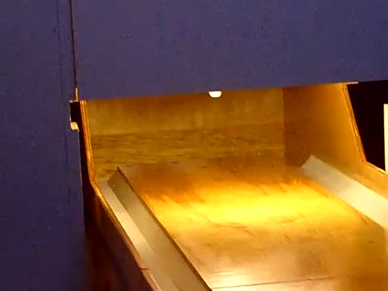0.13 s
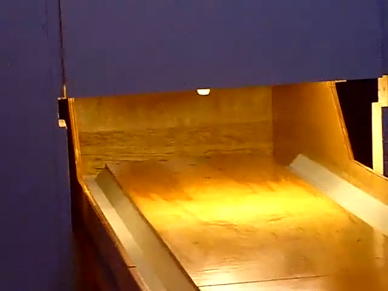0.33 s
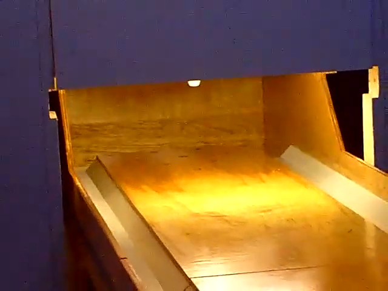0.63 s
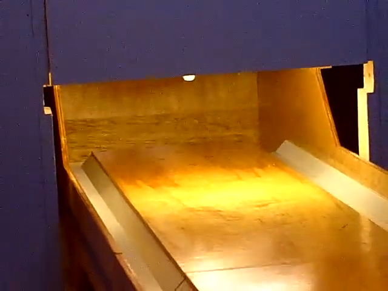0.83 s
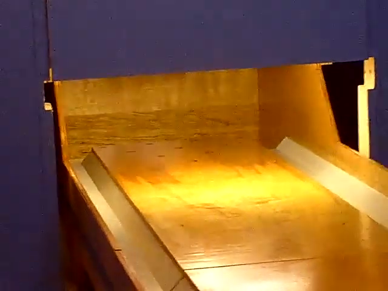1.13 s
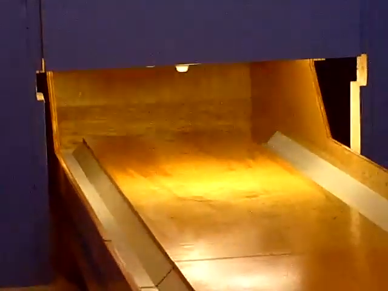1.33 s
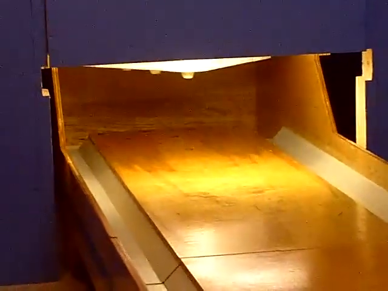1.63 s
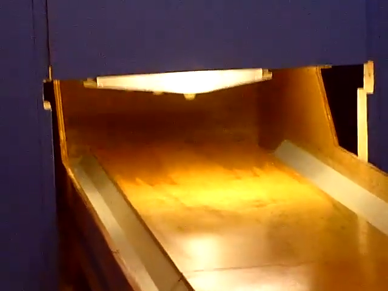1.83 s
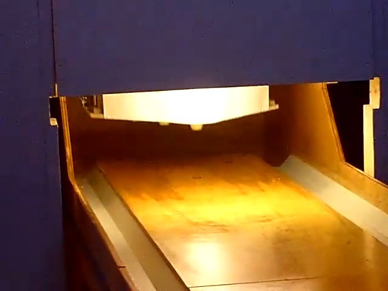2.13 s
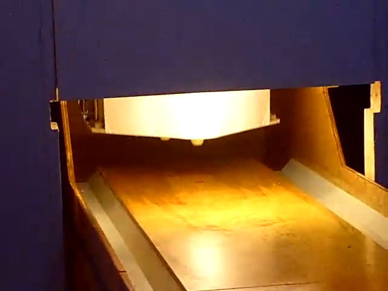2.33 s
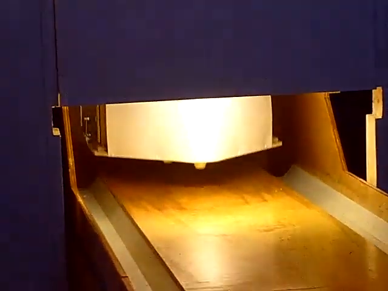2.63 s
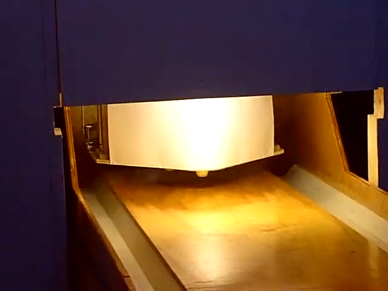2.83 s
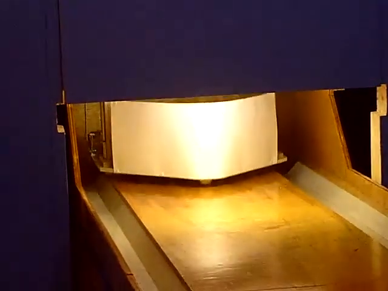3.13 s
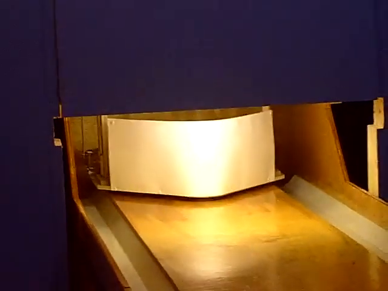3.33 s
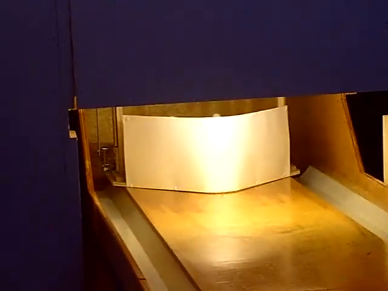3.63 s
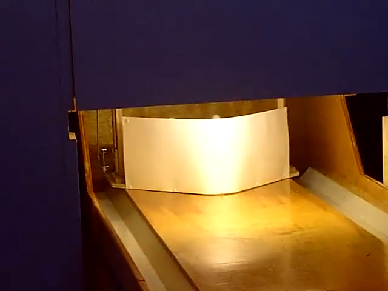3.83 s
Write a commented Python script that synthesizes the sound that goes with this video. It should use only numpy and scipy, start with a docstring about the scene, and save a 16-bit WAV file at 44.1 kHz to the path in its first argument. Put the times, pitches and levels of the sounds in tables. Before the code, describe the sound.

A wooden machine table clunks and scrapes downward, thuds hard on a deck, then jingles lightly

```python
"""Homemade pinsetter, small room

One microphone in a small room: a homemade pinsetter lowers its pin table onto a wooden deck.
The frame knocks as it takes the load; the table slides down its guides and scrapes past a tight spot.
It lands with a heavy rattling thud, and a light metal part jingles as the linkage moves on.
Blows are pushes, dying sines and noise tails; sliding is coloured noise with tiny slips.
Filtered noise makes the room tone."""
import sys
import numpy as np
from scipy import signal
from scipy.fft import rfft, irfft
from scipy.io import wavfile

SR = 44100
rng = np.random.default_rng(int(sys.argv[2]) if len(sys.argv) > 2 else 0)


def to_wav(s):
    """Save 16-bit WAV."""
    ch = np.atleast_2d(s).T  # columns
    pcm = np.round(np.clip(ch, -1, 1) * 32767)  # PCM
    wavfile.write(sys.argv[1], SR, pcm.astype(np.int16))


N = 176400  # samples, 4 s

# Room and microphone noise: f/Hz, level/dB
FLOOR_SPECTRUM = [(60, -6.5), (85, -12.5), (130, -9.5), (300, -15), (480, -16), (800, -23.5), (3000, -32),
                  (9700, -32.5), (12000, -45.5)]
FLOOR_DB = -64
START_S, EDGE_HZ = 0.074, 11500  # recorder start, upper band edge

# Dry ticks close by: t/s, level/dB, dull above f/Hz, ring of the wood behind f/Hz, its level/dB
TICKS = [(1.3992, -43.5, 4200, 1070, 5), (1.4247, -49.5, 11100, 680, 2)]
# Ring of a tick: f/Hz, level/dB
TICK_MODES = [(1450, 0.5), (2300, 1.5), (3000, -3), (4400, -1.5), (7400, -1.5)]
TICK_T60_S, TICK_WOOD_T60_S = 0.0083, 0.016

# Jingle of light metal: f/Hz, level/dB
JINGLE_SPECTRUM = [(1000, -3.5), (2100, -9.5), (3200, -21), (6500, -17.5), (7700, -12), (8600, -5.5),
                   (9400, -15), (12000, -25)]
JINGLE_S, JINGLE_DB, JINGLE_T60_S = 3.842, -14, 0.53
# Range of the ringing of thin metal, and its strength against the noise
METAL_LOW_HZ, METAL_HIGH_HZ, METAL_SHARE = 1787, 9970, 0.62

# Rasp of the linkage: f/Hz, level/dB
RASP_SPECTRUM = [(170, -7.5), (265, 7.5), (370, -7), (600, 1.5), (1200, -4), (1450, -16), (2300, -15.5),
                 (4000, -34)]
RASP_DB = -49
RASP_S, RASP_RISE_S, RASP_FALL_S = 1.04, 0.042, 0.067  # peak time, then times to change by a factor e

# The frame shudders as the table binds, then lets go: f/Hz, level/dB, t60/s
SHUDDER_MODES = [(100, -41, 0.24), (127, -33.5, 0.16), (286.6, -37, 0.15), (693, -49.5, .22)]
SHUDDER_S, SHUDDER_SWELL_S = 2.8, 0.027  # peak time, time to grow by a factor e

# Sliding on the guides: t/s, rumble level/dB, mid rub level/dB, treble hiss level/dB
SLIDE_LEVELS = [(0, -72, -94, -90), (.85, -70.5, -87, -87), (1, -61, -75.5, -85), (1.3, -68.5, -85, -85),
                (1.44, -56.5, -66, -72), (1.56, -56, -67, -77), (1.7, -66, -75.5, -86),
                (1.88, -58.5, -75, -80), (2.03, -57.5, -68.5, -72.5), (2.58, -57.5, -73.5, -73.5),
                (2.77, -50, -62, -63), (2.97, -58, -70, -78), (3.06, -61.5, -65.5, -74),
                (3.23, -60, -71.5, -80.5), (3.8, -53, -64.5, -75), (4, -54.5, -57, -61)]
# Spectra of the rumble, the rub and the hiss, each: f/Hz, level/dB
RUMBLE_SPECTRUM = [(50, -27.5), (100, -7), (148, 5), (200, -3), (380, -6.5), (800, -13.5), (1500, -21),
                   (3000, -54.5), (8000, -41)]
RUB_SPECTRUM = [(600, -20), (1500, -2.5), (2300, 3), (3100, -2), (9000, -17.5)]
HISS_SPECTRUM = [(3000, -19), (6200, -3), (8300, 2), (10000, -4), (12000, -42)]
# Resonances of the guides under the sliding table: f/Hz, width/Hz, level against the rumble/dB
GUIDE_TONES = [(270, 11.5, -10), (793, 36, -18.5), (2138, 45, -23.5), (2770, 47, -26.5)]
# Short scrapes on the guides: t/s, level/dB, rise/s, t60/s of the ringing, dull above f/Hz
SCRAPES = [(1.732, -25.5, 0.0019, 0.37, 10300), (2.775, -15.5, 0.018, 0.45, 10900),
           (3.53, -24.5, .02, 0.91, 10100), (3.65, -23, 0.02, 0.4, 7050), (3.967, -14.5, 0.008, 0.31, 2550)]
# Colour of the scrapes: f/Hz, level/dB
SCRAPE_SPECTRUM = [(500, 2.5), (1300, 1), (2000, -5), (2900, -3), (4200, -5.5), (6000, -3.5), (8500, -3.5),
                   (10500, -8), (12000, -21)]
GRAINS_PER_S, GRAIN_SPREAD_DB, GRAIN_SHARE = 400, 3, 0.41  # share is against the smooth rub
WAVER_DB, WAVER_HZ = 1.5, 22  # uneven pressure on the guides

# Knocks in the frame: t/s, level/dB, rise/s, muffled above f/Hz, boom level/dB
KNOCKS = [(0.691, -15, 0.012, 1460, -8.5), (.85, -25, 0.016, 500, -10), (.967, -15, 0.0051, 1500, -12),
          (1.725, -2, 0.0027, 2970, -30), (1.744, -0.5, 0.0041, 1160, -10.5), (2.741, -18, .006, 500, -2.5),
          (2.7855, -6, 0.01, 1500, -3), (2.825, -10.5, 0.0045, 1400, -3.5), (3.622, 3, 0.02, 506, 5.5),
          (3.839, -16, 0.0064, 3000, -16), (3.92, -3.5, 0.022, 2600, -7), (3.969, -12, 0.0067, 5940, -27)]
# Colour of a knock: f/Hz, level/dB
KNOCK_SPECTRUM = [(50, -32.5), (130, 3.5), (300, -4.5), (380, -8), (580, -2), (900, -8.5), (1250, -5.5),
                  (1550, -16.5), (8000, -25)]
# Decay of a knock: f/Hz, t60/s
KNOCK_T60 = [(120, 1), (500, 0.52), (2000, 0.79), (8000, 0.67)]
# Ring of the cabinet's panels under the knocks: f/Hz, level/dB, t60/s
PANEL_MODES = [(181.7, 0.5, 0.57), (272.3, 1, 0.4), (420.5, -3, 0.48), (475, -3.5, 0.5), (569, -0.5, 0.47),
               (691, -7, 0.57), (760, -8, 0.44), (1060, -5, .4), (1160, -15, 0.32), (1307, -5.5, 0.47),
               (1680, -9.5, 0.35), (2990, -13, 0.39)]
# Boom of the frame: f/Hz, level/dB, t60/s
FRAME_MODES = [(126.6, 5, 0.44), (143, -0.5, 0.29), (168.6, -3, 0.45), (269.1, -6.5, 0.54),
               (287.4, -1, 0.33)]
KNOCK_DB, PANEL_DB, BOOM_DB = -11.5, -51, -44

# The table's full weight thuds through the deck: f/Hz, level/dB, t60/s
THUD_MODES = [(170, -24, 0.23), (286, -19.5, 0.24), (299, -20.5, 0.2)]
THUD_S, THUD_RISE_S = 3.254, 0.0088

# The table hits the deck and chatters: t/s, blow level/dB, crack level/dB
LANDING_BLOWS = [(3.2477, -12.5, -17), (3.2505, -0.5, 2), (3.2565, -1.5, -6), (3.2648, 1, -10),
                 (3.269, 0, -12), (3.289, 0.5, 3.5), (3.298, -1.5, -0.5), (3.305, -10.5, -3.5),
                 (3.3131, -10.5, -19), (3.321, -9.5, -16), (3.346, -15.5, -2.5), (3.405, -9.5, -6.5),
                 (3.421, -9.5, -12), (3.437, -9, -4.5), (3.467, -15, -5.5), (3.51, -17.5, -8.5)]
# Colour of the wooden blows: f/Hz, level/dB
WOOD_SPECTRUM = [(90, -31.5), (130, -5.5), (190, -1), (290, -0.5), (400, -6.5), (520, -6), (780, -6),
                 (1050, -9.5), (1400, -19.5), (2100, -30), (3000, -43), (6000, -59.5)]
# Decay of the wood: f/Hz, t60/s
WOOD_T60 = [(120, 0.66), (250, 0.53), (500, 0.86), (1000, 0.63), (2000, 0.76), (8000, 0.41)]
# Colour of the cracks: f/Hz, level/dB
CRACK_SPECTRUM = [(500, -31), (2000, 1.5), (10000, -1), (12000, -11)]
# Ring of table and deck: f/Hz, level/dB, t60/s
DECK_MODES = [(171, -7, .6), (285, -1, .45), (443, -6, .45), (495, -5.5, .4), (529, -3, .45),
              (594, -10, .6), (680, -7, .45), (750, -6, .5), (783, -6, .45), (864, -12, .55), (996, -5, .4),
              (1032, -2.5, .42), (1125, -15, .4), (1167, -16, .5), (1660, -26, .4), (1949, -26, .45)]
WOOD_DB, CRACK_DB, DECK_DB = 4.5, -25, -44
WOOD_DIRECT, CRACK_DIRECT = 0.6, 0.46  # gains of the direct push
EARLY_DB, EARLY_T60_S = -1, 0.025  # first reflections inside the cabinet


def amp(db):
    """Decibels to gain."""
    return 10 ** (np.asarray(db) / 20)


def unit(x):
    """Scales to rms 1."""
    return x / np.sqrt(np.mean(x ** 2) + 1e-20)


def read(points, hz):
    """Reads a table on a log-frequency axis."""
    f, value = np.transpose(points)
    return np.interp(np.log(hz + 1), np.log(f + 1), value)


def add(mix, s, sound):
    """Mixes a sound in at time s, cut at the end of the mix."""
    part = mix[round(s * SR):][:len(sound)]
    part += sound[:len(part)]


def colour(x, points, size=4096):
    """Causal (minimum-phase) filter of unit energy with the given spectrum."""
    hz = abs(np.fft.fftfreq(size, 1 / SR))
    log_gain = np.log(amp(read(points, hz)))
    response = np.exp(np.conj(signal.hilbert(log_gain)))
    taps = np.fft.ifft(response).real[:size // 2]
    return signal.oaconvolve(x, taps / np.linalg.norm(taps))[:len(x)]


def dull(x, hz):
    """Gentle second-order low-pass."""
    b, a = signal.butter(2, min(hz, SR / 3), fs=SR)
    return signal.lfilter(b, a, x)


def tail(t60, rise_s, size=256):
    """Dense reflections of cabinet and room: decaying noise, one second long, of unit energy."""
    hz, t, noise = signal.stft(rng.choice([-1., 1.], SR), SR, nperseg=size)
    decay = np.exp(-np.log(1000) * t / read(t60, hz)[:, None])
    x = signal.istft(noise * decay, SR, nperseg=size)[1][:SR]
    x = x * np.minimum(np.arange(SR) / SR / rise_s, 1)
    return x / np.linalg.norm(x)


def ring(modes, rise_s):
    """Dying sines of a struck body, one second long."""
    t = np.arange(SR) / SR
    sines = 0
    for hz, db, t60 in modes:
        sines = sines + amp(db) * np.exp(-np.log(1000) * t / t60) * np.sin(2 * np.pi * hz * t)
    return np.minimum(t / rise_s, 1) * sines


def band_noise(hz, width_hz):
    """A narrow, wavering band of noise of rms 1."""
    band = np.exp(-((np.fft.rfftfreq(N, 1 / SR) - hz) / width_hz) ** 2)
    return unit(irfft(rfft(rng.standard_normal(N)) * band, N))


def swell(peak_s, rise_s, fall_s):
    """A level that grows exponentially up to its peak and then dies away."""
    t = np.arange(N) / SR - peak_s
    return np.exp(np.minimum(t / rise_s, -t / fall_s))


def metal(t60, rise_s, count=160):
    """Thin metal: many scattered modes within a noisy tail, of unit energy."""
    hz = rng.uniform(METAL_LOW_HZ, METAL_HIGH_HZ, count)
    db = rng.uniform(2, 4.2, count)
    modes = ring([(f, level, t60) for f, level in zip(hz, db)], rise_s)
    noise = tail([(2000, 2.16 * t60), (9000, 0.64 * t60)], rise_s)  # the treble dies sooner
    x = METAL_SHARE * modes / np.linalg.norm(modes) + noise
    return x / np.linalg.norm(x)


def friction():
    """Many tiny slips of random size and sign over a smooth rub, rms 1."""
    happens = rng.random(N) < GRAINS_PER_S / SR
    size_db = GRAIN_SPREAD_DB * np.minimum(rng.exponential(1, N), 4)
    slips = happens * rng.choice([-1, 1], N) * amp(size_db)
    return unit(GRAIN_SHARE * unit(slips) + rng.standard_normal(N))


def waver():
    """Random gain of a contact whose pressure is uneven."""
    return amp(WAVER_DB * band_noise(0, WAVER_HZ))


def room_tone():
    """Quiet room rumble and microphone hiss, as steady filtered noise."""
    return amp(FLOOR_DB) * colour(rng.standard_normal(N), FLOOR_SPECTRUM)


def small_parts():
    """Two dry ticks of short-lived modes, and a bright jingle of light metal."""
    out = np.zeros(N)
    snap = ring([(hz, db, TICK_T60_S) for hz, db in TICK_MODES], rise_s=0.00022)
    click = snap - 2 * signal.unit_impulse(SR)
    for s, db, dull_hz, wood_hz, wood_db in TICKS:
        wood = ring([(wood_hz, wood_db, TICK_WOOD_T60_S)], rise_s=0.001)
        add(out, s, amp(db) * (dull(click, dull_hz) + wood))
    jingle = colour(metal(JINGLE_T60_S, rise_s=0.0067), JINGLE_SPECTRUM)
    add(out, JINGLE_S, amp(JINGLE_DB) * jingle)
    return out


def rasp():
    """A short, grainy rub as the linkage takes up slack."""
    level = amp(RASP_DB) * swell(RASP_S, RASP_RISE_S, RASP_FALL_S)
    return level * colour(friction(), RASP_SPECTRUM)


def shudder():
    """At the tight spot the frame's vibration builds up, then dies as the table slips free."""
    t = np.arange(N) / SR - SHUDDER_S
    out = np.zeros(N)
    for hz, db, t60 in SHUDDER_MODES:
        level = amp(db) * swell(SHUDDER_S, SHUDDER_SWELL_S, t60 / np.log(1000))
        out += level * np.cos(2 * np.pi * hz * t)
    return out


def slide():
    """Friction makes the table rumble, rub and hiss along its guides and scrape at tight spots."""
    s, *levels = np.transpose(SLIDE_LEVELS)
    t = np.arange(N) / SR
    rumble_gain, rub_gain, hiss_gain = (amp(np.interp(t, s, db)) for db in levels)
    tones = sum(amp(db) * band_noise(hz, width_hz) for hz, width_hz, db in GUIDE_TONES)
    rumble = rumble_gain * (colour(friction(), RUMBLE_SPECTRUM) + tones)
    rub = rub_gain * colour(friction(), RUB_SPECTRUM)
    hiss = hiss_gain * colour(friction(), HISS_SPECTRUM)
    scrapes = np.zeros(N)
    for start_s, db, rise_s, t60, dull_hz in SCRAPES:
        add(scrapes, start_s, amp(db) * dull(metal(t60, rise_s), dull_hz))
    return rumble + waver() * (rub + hiss) + colour(scrapes, SCRAPE_SPECTRUM)


def knocks():
    """Muffled blows inside the cabinet ring its panels and set the frame booming."""
    out = np.zeros(N)
    for s, db, rise_s, muffle_hz, boom_db in KNOCKS:
        blow = amp(KNOCK_DB) * colour(tail(KNOCK_T60, rise_s), KNOCK_SPECTRUM)
        panels = amp(PANEL_DB) * ring(PANEL_MODES, rise_s)
        boom = amp(BOOM_DB + boom_db) * ring(FRAME_MODES, rise_s)
        add(out, s, amp(db) * dull(blow + panels, muffle_hz) + boom)
    return out


def thud():
    """The deep, short boom under the landing, as dying low modes."""
    out = np.zeros(N)
    add(out, THUD_S, ring(THUD_MODES, THUD_RISE_S))
    return out


def landing():
    """Each blow is a push, early reflections, a dense wooden tail and a thin crack; all ring the deck."""
    wood, crack, blows = np.zeros((3, N))
    push = signal.unit_impulse(SR)
    for s, db, crack_db in LANDING_BLOWS:
        early = amp(EARLY_DB) * tail([(1000, EARLY_T60_S)], rise_s=0.00053)
        wood_tail = tail(WOOD_T60, rise_s=0.011)
        crack_tail = tail([(2000, 0.45), (9000, 0.33)], rise_s=0.001)
        add(wood, s, amp(db) * (WOOD_DIRECT * push + early + wood_tail))
        add(crack, s, amp(crack_db) * (CRACK_DIRECT * push + crack_tail))
        add(blows, s, amp(db) * push)
    deck = np.zeros(N)
    for hz, db, t60 in DECK_MODES:
        mode = signal.oaconvolve(blows, ring([(hz, 0, t60)], rise_s=0.0029))[:N]
        deck += amp(db) * unit(mode)  # levels hold for the whole train of blows
    wood = amp(WOOD_DB) * colour(wood, WOOD_SPECTRUM)
    crack = amp(CRACK_DB) * colour(crack, CRACK_SPECTRUM)
    return wood + crack + amp(DECK_DB) * deck


def scene():
    """All sources at one microphone, from the background to the landing."""
    background = room_tone() + small_parts() + rasp()
    machine = shudder() + slide() + knocks()
    return (background + machine + thud() + landing())[None]


def record(dry):
    """The recorder starts after a moment of silence and limits the band."""
    running = dry * (np.arange(N) / SR > START_S)
    low_pass = signal.firwin(101, EDGE_HZ, window=("kaiser", 8), fs=SR)
    return signal.oaconvolve(running, low_pass[None], "same")


dry = scene()
out = record(dry)
to_wav(out)
```